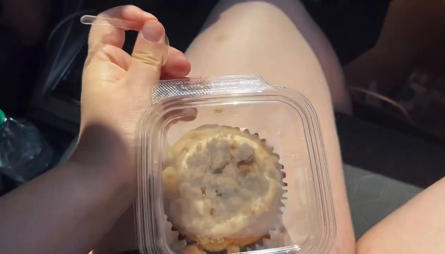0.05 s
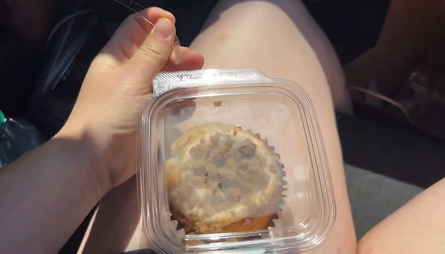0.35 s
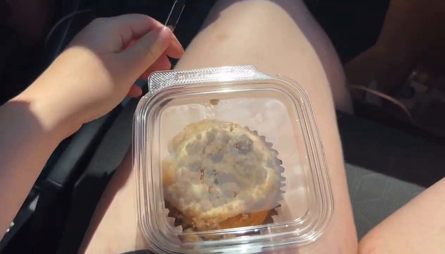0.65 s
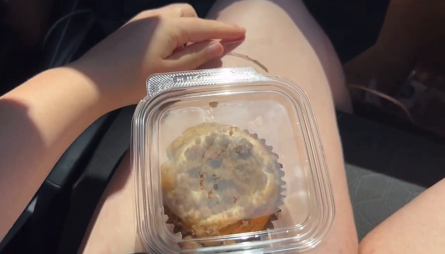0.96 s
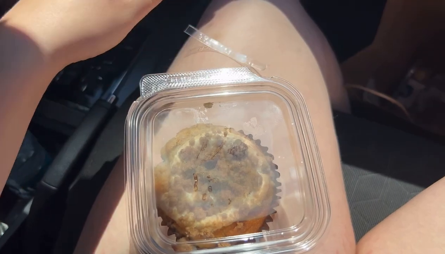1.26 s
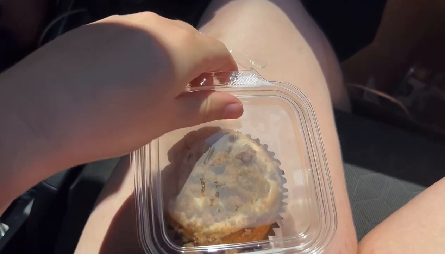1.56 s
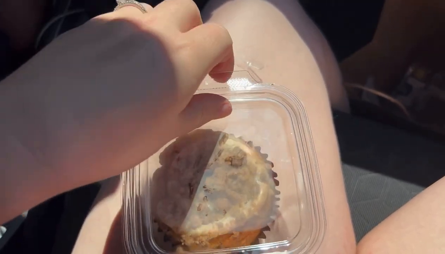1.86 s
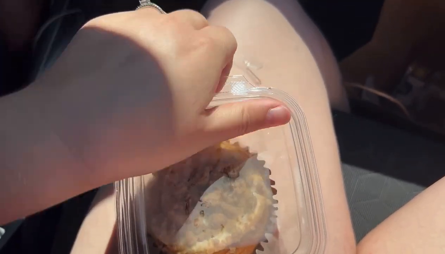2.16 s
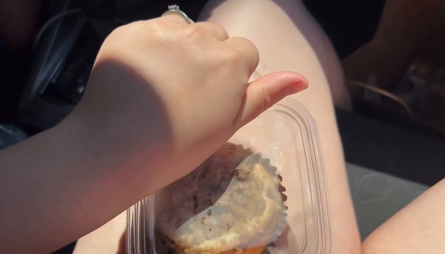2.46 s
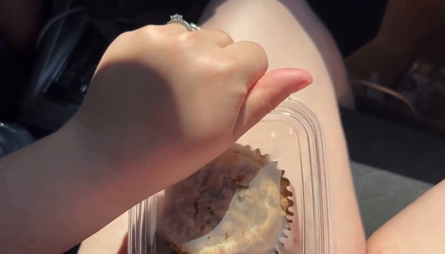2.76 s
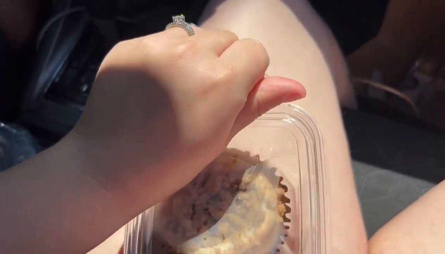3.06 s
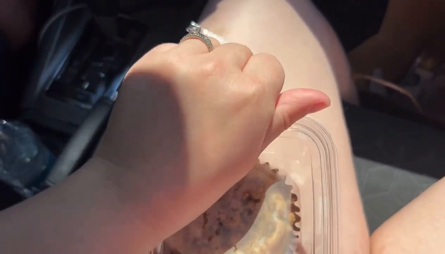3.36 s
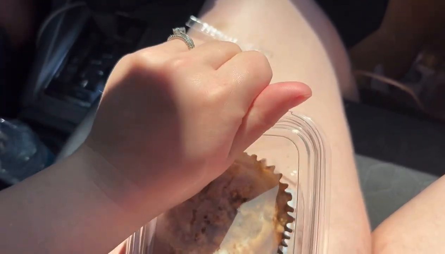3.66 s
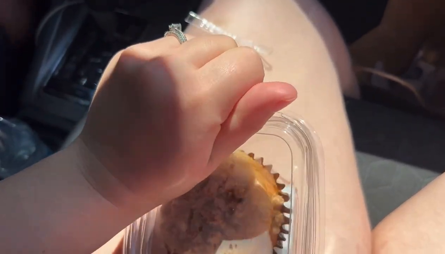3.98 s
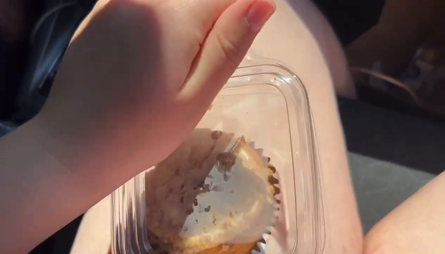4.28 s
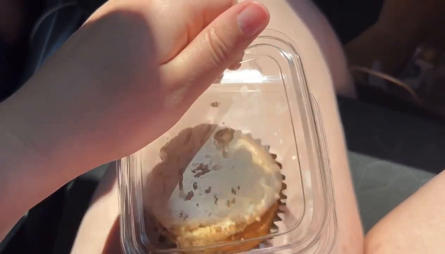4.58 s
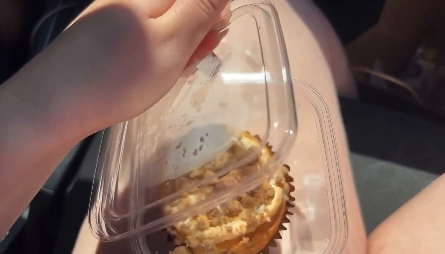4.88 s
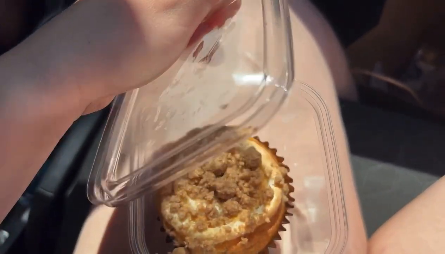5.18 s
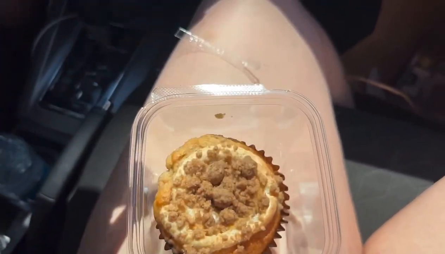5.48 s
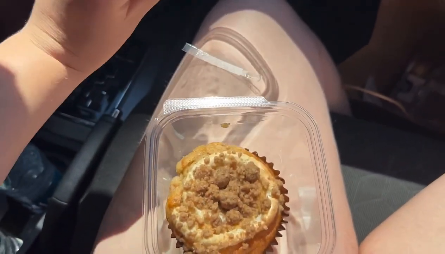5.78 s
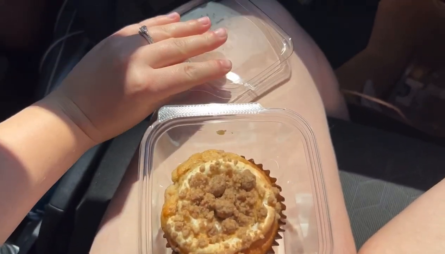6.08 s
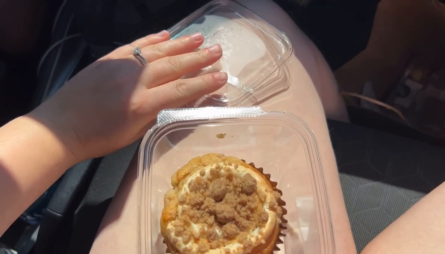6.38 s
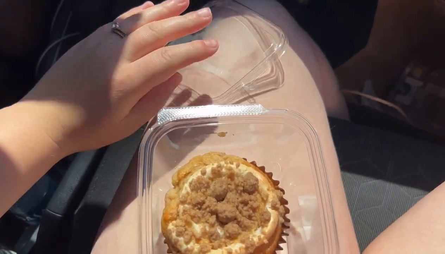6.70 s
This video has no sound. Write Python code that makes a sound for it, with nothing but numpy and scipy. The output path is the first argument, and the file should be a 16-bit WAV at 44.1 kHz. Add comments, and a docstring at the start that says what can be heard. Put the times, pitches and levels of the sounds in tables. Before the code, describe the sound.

A moving car's low rumble runs throughout, with dull bumps from the road and handling. Close to the microphone, a thin plastic food box gives a sharp click right at the start, then a tiny squeak. Fingers rub and pick at the rim in scattered ticks and crackles, with another short squeak at about 1.6 seconds. At 2.3 seconds the latch lets go with a loud snap that briefly rings the lid. Dry scraping and fine ticks follow, then a loud squeak at 3.2 seconds that drops into a rough creak. A smaller squeak comes at 3.8 seconds, and at 3.9 the lid pops out of the hollow tub, rebounding with a few clicks until about 4.2. From 4.5 seconds to the end, near 7, the handling is quieter: soft swishes, light skids and faint ticks as the lid is folded back over the rumble.

```python
"""Inside a moving car, a thin clear plastic food box is pried open on a lap, close to the microphone.
The cabin rumbles underneath, with dull bumps from the road and the handling. Fingers rub and pick
at the rim, which ticks as it buckles; plastic sticks and slips on plastic in squeaks and creaks.
The latch snaps and rings the lid, then the lid pops out of the hollow tub and is folded back."""
import sys
import numpy as np
from scipy import signal
from scipy.fft import rfft, irfft, next_fast_len
from scipy.io import wavfile
from scipy.ndimage import map_coordinates

SR = 44100
rng = np.random.default_rng(int(sys.argv[2]) if len(sys.argv) > 2 else 0)


def to_wav(sig):
    """Store sig (one row per channel, or 1-D mono) as 16-bit WAV at the path in sys.argv[1].

    Samples outside -1..1 are clipped; the rate is SR.
    """
    pcm = np.clip(np.atleast_2d(sig), -1, 1) * 32767
    pcm = np.round(pcm).astype(np.int16)
    wavfile.write(sys.argv[1], SR, pcm.T)  # frames by channels


N = 301677
TOP_HZ = 15900  # upper edge of the sound
PRE_ROLL_S, PRE_ROLL = 1 / 500, SR // 500  # room for a filter to ring ahead of a click: seconds, samples


def amp(db):
    """Decibels to gain."""
    return 10 ** (np.asarray(db) / 20)


def unit(x):
    """Scales to rms 1."""
    return x / np.sqrt(np.mean(x ** 2) + 1e-20)


def unit_hit(x):
    """Scales a short sound to the energy of 20 ms at rms 1."""
    return x * np.sqrt(.02 * SR / (np.sum(x ** 2) + 1e-20))


def curve_at(points, hz):
    """Reads a curve on a log-frequency axis."""
    f, value = np.transpose(points)
    return np.interp(np.log(hz + 1), np.log(f + 1), value)


def eq(x, points):
    """Filters by a curve of (Hz, dB) points."""
    return irfft(rfft(x) * amp(curve_at(points, np.fft.rfftfreq(len(x), 1 / SR))), len(x))


def wander(count, per_s):
    """Smooth random drift of rms about 1."""
    knots = rng.standard_normal(count // 20 + 4)
    position = np.arange(count) / (SR / per_s)
    return map_coordinates(knots, [position], order=1, mode="wrap") * np.sqrt(3 / 2)


def add(mix, s, sound):
    """Adds a sound at s seconds."""
    start = round(s * SR)
    part = mix[max(start, 0):][:len(sound) + min(start, 0)]
    part += sound[max(-start, 0):][:len(part)]


# Tone of the cabin bed. Each row: frequency in Hz, gain in dB.
CABIN_EQ = [(15, -37), (30, -10), (43, 1.5), (55, 4.5), (75, 1), (110, -3), (145, -5), (172, -5.5),
            (210, -11.5), (400, -21.5), (600, -20.5), (760, -31.5), (1300, -33), (1550, -37), (2100, -41),
            (3000, -47.5), (6000, -59), (15000, -100.5)]
# Rougher and smoother stretches of road. Each row: time in seconds, bass gain in dB.
ROAD_SWELL = [(0, -4), (1.6, -2), (2.4, 0.5), (4.3, -0.5), (4.65, 2), (5.149, -2), (5.8, -3), (6.831, -2)]
def cabin():
    """Road rumble and ventilation; the bass swells and sits almost in the centre."""
    hz = np.fft.rfftfreq(N, 1 / SR)
    bass = 1 / (1 + (hz / 260) ** 4)
    swell = amp(np.interp(np.arange(N) / SR, *np.transpose(ROAD_SWELL)) + 1.7 * wander(N, 14))
    spectra = rfft(np.array([unit(eq(rng.standard_normal(N), CABIN_EQ)) for _ in range(2)]))
    spectra[1] *= amp(curve_at([(60, -20.5), (300, -8), (1000, -1)], hz))  # narrows the low end
    mid, side = irfft(spectra * bass, N) * swell + irfft(spectra * (1 - bass), N)
    return amp(-36) * np.array([mid + side, mid - side])


def jolts(per_s=5, centre_hz=143.8, db=-45, spread_db=.5):
    """Bump rows for the small jolts that fall at random between the large ones."""
    slots = np.arange(0, N / SR, .05)
    chance, pitch, size = rng.random((len(slots), 3)).T
    rows = np.c_[slots, centre_hz * 2 ** (pitch - .5), db + spread_db * (2 * size - 1)]
    return list(rows[chance < per_s * slots[1]])


# Dull thuds of road and handling. Each row: time in seconds, pitch in Hz, relative level in dB.
THUDS = [(0.452, 112, -34), (0.482, 179, -40), (0.684, 95, -30), (0.815, 149.5, -37.5), (0.987, 106.7, -30),
         (1.258, 102.6, -29), (1.507, 155.5, -33.5), (1.842, 172, -39), (1.864, 141, -34),
         (2.461, 108, -33.5), (2.722, 200, -39), (2.973, 143, -32), (3.243, 167, -38), (3.581, 159, -34.5),
         (3.611, 61.6, -31), (3.923, 167, -34.5), (4.089, 75, -36), (4.209, 140, -34.5), (4.609, 96, -35),
         (4.961, 145.5, -29.5), (5.083, 124, -41.5), (5.488, 152, -36.5), (5.597, 91, -33.5),
         (5.659, 167, -40), (5.962, 185, -40), (6.341, 148, -36.5), (6.577, 71, -33.5)]
def bumps():
    """Each bump is a low heave of a few cycles with a soft knock on top."""
    out = np.zeros(N)
    t = np.arange(SR // 7) / SR
    rise_s, knock_rise_s = .0048, .0037
    for s, hz, db in THUDS + jolts():
        heave = (t / rise_s) ** 2 * np.exp(-t / rise_s) * np.cos(2 * np.pi * hz * (t - 2 * rise_s))
        puff = rng.standard_normal(len(t)) * (t / knock_rise_s) ** 2 * np.exp(-t / knock_rise_s)
        knock = signal.sosfilt(signal.butter(3, [1.26 * hz, 3 * hz], "band", fs=SR, output="sos"), puff)
        knock_db = -7.5 + 7.5 * np.log2(hz / 100)  # quicker bumps knock harder
        add(out, s - 2 * rise_s, amp(db) * (unit_hit(heave) + amp(knock_db) * unit_hit(knock)))
    return out * amp(3)


# What the seats leave of an echo. Each row: frequency in Hz, gain in dB.
SEAT_EQ = [(1500, 2), (5000, 3), (12000, -12)]
def reflections(x, t60, wet_db):
    """Windows and dashboard return a short stereo echo; the seats dull its top."""
    t = np.arange(SR // 6) / SR
    taps = rng.standard_normal((2, len(t))) * (rng.random((2, len(t))) < 2500 / SR)
    taps *= (t > .002) * amp(-60 * t / t60)
    taps /= np.linalg.norm(taps, axis=1, keepdims=True)
    return amp(wet_db) * signal.oaconvolve(eq(x, SEAT_EQ)[None], taps, axes=1)[:, :N]


# Stereo spread of the box. Each row: frequency in Hz, relative scatter of the left-right phase.
PHASE_SPREAD = [(300, .1), (750, .7), (1400, 1.0), (2200, .6), (5300, .75), (7000, .25)]
def near_field(x):
    """Close to the box, each resonance reaches the two microphone ports with its own phase."""
    size = next_fast_len(N + SR // 4)
    hz = np.fft.rfftfreq(size, 1 / SR)
    scatter = np.interp(hz / 190, np.arange(130), rng.uniform(-1.7, 1.7, 130))
    lead = curve_at(PHASE_SPREAD, hz) * scatter * np.sqrt(3 / 2)
    return irfft(rfft(x, size) * np.exp(1j * np.array([[.5], [-.5]]) * lead), size)[:, :N]


# The grip builds up to the snap and eases once the lid is free.
# Each row: time in seconds, scrape level in dB, swish level in dB.
GRIP = [(0, -59, -68), (.95, -68.5, -74), (1.25, -73, -86.5), (1.5, -57.5, -68), (2.0, -51.5, -64.5),
        (2.27, -45, -65), (2.36, -41.5, -53), (2.9, -50.5, -64), (3.68, -45, -59.5), (3.88, -53.5, -69),
        (4.5, -61, -60.5), (4.9, -59, -76.5), (6.83, -68, -67.5)]
# Hand moves over the box. Each row: start in seconds, length in seconds,
# share of the length at which it is fastest, peak scrape in dB, peak swish in dB.
HAND_STROKES = [(0, .023, 0.14, -21.5, -26.5), (.03, 0.14, .4, -53, -57.5), (0.122, 0.17, .3, -53, -57.5),
                (.44, 0.098, 0.59, -54, -59.5), (0.743, 0.062, 0.39, -48.5, -58),
                (0.885, 0.057, .55, -50, -51), (1.502, 0.18, 0.68, -50.5, -53.5),
                (1.72, 0.13, 0.64, -46.5, -56), (2.44, 0.1, 0.4, -52, -49), (2.587, 0.1, 0.4, -46.5, -52.5),
                (2.694, 0.12, 0.53, -46, -70), (2.782, .16, 0.39, -66, -56), (3.025, 0.15, 0.6, -62, -53.5),
                (3.208, 0.1, 0.34, -45, -51), (3.457, 0.37, 0.27, -59, -60),
                (3.744, 0.091, 0.47, -56.5, -53.5), (3.938, 0.19, 0.28, -43, -53.5),
                (4.027, 0.33, 0.54, -48, -53.5), (4.155, 0.042, 0.4, -48, -47),
                (4.304, 0.13, 0.58, -66, -60), (4.56, 0.11, 0.58, -76, -55.5),
                (5.028, 0.75, 0.25, -60, -62.5), (5.611, 0.18, 0.3, -71, -55.5),
                (5.866, 0.38, 0.29, -55, -54.5), (6.378, 0.18, 0.46, -56.5, -51)]
def hand_contact():
    """Fader rides in dB for scrape and swish: steady prying, plus an arch for each stroke."""
    s, *grip_db = np.transpose(GRIP)
    power = amp([np.interp(np.arange(N) / SR, s, db) for db in grip_db]) ** 2
    for start, length, peak, scrape_db, swish_db in HAND_STROKES:
        progress = np.arange(0, length, 1 / SR) / length
        ramp = np.interp(progress, [0, np.clip(peak, .05, .95), 1], [0, 1, 0])
        speed = np.sin(np.pi / 2 * ramp) ** 1.29
        add(power[0], start, (amp(scrape_db) * speed) ** 2)
        add(power[1], start, (amp(swish_db) * speed) ** 2)
    return 10 * np.log10(power)


def friction(per_s, spread_db, smooth_db):
    """Countless tiny catches of uneven size over a smooth slide."""
    size = amp(spread_db * np.minimum(rng.exponential(1, N), 4)) * rng.choice([-1, 1], N)
    catches = unit(size * (rng.random(N) < per_s / SR))
    return unit(catches + amp(smooth_db) * rng.standard_normal(N))


# Tone of the low scrape and of the airy swish. Each row: frequency in Hz, gain in dB.
SCRAPE_EQ = [(200, -8), (450, 3.5), (800, -1.5), (1300, -7.5), (2400, -13), (4000, -21), (8000, -75)]
SWISH_EQ = [(1000, -13), (2500, -1.5), (3500, -1.5), (7000, -3), (9000, -7.5), (12000, -3.5), (15500, -6)]
def rubbing(scrape_db, swish_db):
    """The rim scrapes in dry catches, each a short rattle of the sheet; skin swishes over it."""
    t = np.arange(SR // 40) / SR
    catch_power = friction(per_s=230, spread_db=4, smooth_db=-7) ** 2
    rattle = np.sqrt(abs(signal.oaconvolve(catch_power, amp(-120 * t / .012))[:N]))
    scrape = unit(eq(rattle * rng.standard_normal(N), SCRAPE_EQ))
    swish = unit(eq(friction(per_s=1100, spread_db=0, smooth_db=6), SWISH_EQ))
    pressure_db = 2.08 * wander(N, 70)
    return scrape * amp(scrape_db + pressure_db) + swish * amp(swish_db + pressure_db)


# Tone of the fine rib ticks. Each row: frequency in Hz, gain in dB.
GRIT_EQ = [(800, -9), (2000, 2), (4500, 0), (7500, -2), (15000, -17)]
def grit(scrape_db, swish_db):
    """Dry, separate ticks as the ribs of the rim ride over each other, only under a firm scrape."""
    per_s = np.interp(scrape_db, [-57, -50], [0, 90])
    ticks = amp(3.5 * np.minimum(rng.exponential(1, N), 3)) * (rng.random(N) < per_s / SR)
    decay = amp(-60 * np.arange(SR // 100) / SR / .005)
    bursts = signal.oaconvolve(ticks, decay)[:N] * rng.standard_normal(N)
    return unit(eq(bursts, GRIT_EQ)) * amp(np.minimum(swish_db, -50) - 5)


def stutter_db(count):
    """The level flutters as a rough contact catches and lets go."""
    return 4 * wander(count, per_s=170)


# Skin and rim skidding over the sheet. Each row: start in seconds, length in seconds,
# opening pitch in Hz, closing pitch in Hz, resonance width in Hz, level in dB.
SKID_SWEEPS = [(4.612, .04, 4500, 5600, 900, -60), (5.7, 0.082, 4600, 5140, 550, -57.5),
               (5.881, 0.12, 2720, 2600, 260, -60), (5.985, 0.12, 3100, 4360, 1200, -57.5),
               (6.432, 0.083, 3300, 4200, 1300, -56)]
def skids():
    """Uneven catches ring one resonance that slides as the contact moves."""
    out = np.zeros(N)
    catches = friction(per_s=700, spread_db=10.5, smooth_db=0)
    for start, length, from_hz, to_hz, width_hz, db in SKID_SWEEPS:
        progress = np.arange(0, length, 1 / SR) / length
        sweep = np.exp(2j * np.pi * np.cumsum(from_hz + (to_hz - from_hz) * progress) / SR)
        pole = np.exp(-np.pi * width_hz / SR)
        drive = catches[round(start * SR):][:len(sweep)]
        ring = sweep * signal.lfilter([1], np.poly([pole, pole]), drive / sweep)  # a moving band-pass
        skid = unit(ring.real * amp(stutter_db(len(ring))))
        add(out, start, amp(db) * np.sin(np.pi * progress) * skid)
    return out


# Pin-sharp ticks. Each row: time in seconds, level in dB.
EDGE_TICKS = [(2.022, -52), (2.429, -53), (2.618, -53), (2.6647, -49), (2.67, -52), (2.984, -57),
              (3.051, -60), (3.478, -56), (3.8189, -45.5), (4.018, -57), (4.162, -49), (4.18, -43.5),
              (4.206, -40.5), (4.471, -50.5), (5.455, -57), (5.463, -53)]
# Their bright tone. Each row: frequency in Hz, gain in dB.
EDGE_EQ = [(500, -23), (3000, -8), (7500, 0), (15000, 6)]
def edge_flicks(t60=.002):
    """The cut edge flicks past a rib, too briefly to ring the sheet."""
    out = np.zeros(N)
    t = np.arange(SR // 50) / SR
    for s, db in EDGE_TICKS:
        crack = rng.standard_normal(len(t)) * amp(-60 * t / t60)
        add(out, s - PRE_ROLL_S, amp(db) * unit_hit(eq(np.pad(crack, (PRE_ROLL, 0)), EDGE_EQ)))
    return out


# The voice of the lid. Each row: pitch in Hz, relative level in dB, t60 in seconds before damping.
LID_MODES = [(484, -3, .06), (568, -7, .11), (800, -3, .051), (905, 4.5, .076), (1095, -1, .051),
             (1230, -2, .065), (1385, -6, .06), (1645, 6, .046), (1795, 0, .07), (2110, -1, .051),
             (2735, 4, .032), (2895, 0, .04), (3115, -2, .033), (4215, -3, .045), (4760, -6, .045),
             (5800, -8, .039)]
def lid_ring(detune, scatter_db, sheet_db, sheet_t60, damping):
    """The lid's modes, shifted by the grip, over the dense short ring of thin sheet."""
    t = np.arange(SR // 8) / SR
    hz, db, t60 = np.transpose(LID_MODES)[:, :, None]
    shift, weight = rng.standard_normal((2, len(LID_MODES), 1))
    decays = amp(db + scatter_db * weight - 60 * damping * t / t60)
    modes = decays * np.sin(2 * np.pi * hz * (1 + detune * shift) * t)
    modes[::2] *= -1  # neighbouring modes push the air in opposite senses
    sheet = rng.standard_normal(len(t)) * amp(-60 * t / sheet_t60)
    return unit_hit(modes.sum(0)) + amp(sheet_db) * unit_hit(sheet)


# One curve per squeak. Each row: time in seconds, slip rate in Hz, level in dB,
# roughness from 0 to 1, overtone roll-off as the drop to the second harmonic in dB.
SQUEAK_CURVES = [
    [(.088, 600, -52, .05, 8), (.113, 505, -39, .05, 14), (.135, 510, -54, 0, 21)],
    [(1.612, 6100, -54, .1, 16), (1.62, 6200, -40, .12, 13), (1.64, 6100, -45, .2, 7),
     (1.668, 6300, -52, .25, 5)],
    [(1.63, 560, -42, .5, 6), (1.66, 540, -34, .2, 13), (1.68, 510, -50, .1, 20)],
    [(3.217, 1120, -48, .01, 16), (3.222, 1035, -29, .01, 4), (3.228, 1000, -20, .03, 3.8),
     (3.233, 960, -29, .1, 2.5), (3.242, 920, -39, .15, 1)],
    [(3.243, 975, -37, .2, 1), (3.264, 965, -37, .25, 1.5), (3.27, 970, -30, .2, 3),
     (3.281, 940, -30, .4, 5), (3.3, 940, -29, .45, 4), (3.32, 620, -33, .6, 4.5),
     (3.337, 480, -44, .2, 10)],
    [(3.781, 1200, -41, .02, 26), (3.793, 1230, -37, .01, 26), (3.802, 1260, -34, .01, 26),
     (3.812, 1310, -39, .01, 28), (3.823, 1330, -48, .02, 30)],
]
def squeaks():
    """Plastic sticks and slips on plastic; uneven slips turn the squeak into a creak."""
    out = np.zeros(N)
    harmonic = np.arange(1, 6)[:, None]
    for rows in SQUEAK_CURVES:
        s, *columns = np.transpose(rows)
        t = np.arange(s[0], s[-1], 1 / SR)
        hz, db, rough, loss_db = (np.interp(t, s, c) for c in columns)
        jitter_hz = (150 + .16 * hz) * rough * wander(len(t), 913)
        cycles = np.cumsum(hz + jitter_hz) / SR
        gains = amp(-loss_db * (harmonic - 1) ** 1.2) * (harmonic * hz < TOP_HZ)
        tone = (gains * np.sin(2 * np.pi * harmonic * cycles)).sum(0) / np.sqrt((gains ** 2).sum(0) / 2)
        body = lid_ring(detune=.06, scatter_db=-12, sheet_db=-3, sheet_t60=.0204, damping=4.6)
        rattle = unit(signal.fftconvolve(tone, body)[:len(t)])
        envelope = amp(db + rough * stutter_db(len(t))) * signal.windows.tukey(len(t), .08)
        add(out, s[0], envelope * (np.sqrt(1 - rough) * tone + np.sqrt(rough) * rattle))
    return out


def slips(length, per_s, rise, spread_db):
    """A short avalanche of tiny buckles around one main slip."""
    progress = np.arange(max(round(length * SR), 8)) / SR / length
    count = len(progress)
    chance, size = rng.random(SR // 20)[:count], rng.standard_normal(SR // 20)[:count]
    burst = (chance < per_s / SR) * np.sign(size) * amp(spread_db * (abs(size) - .5))
    burst *= np.interp(progress, [0, rise, 1], [.3, 1, .35])
    burst[int(rise * count)] += 1.5  # the main slip
    return burst


# The four bands that shape a click. Each entry: a band edge in Hz.
BAND_EDGES = [400, 1300, 3500, 8000, 16000]
BAND_LOW, BAND_HIGH = np.array(BAND_EDGES[:-1]), np.array(BAND_EDGES[1:])
BAND_CENTRES = np.sqrt(BAND_LOW * BAND_HIGH)
def shape_bands(x, levels_db):
    """Sets a click's weight and brightness: a smooth EQ pulls each band towards its level."""
    hz, spectrum = np.fft.rfftfreq(len(x), 1 / SR), rfft(x)
    bands = [(hz >= low) & (hz < high) for low, high in zip(BAND_LOW, BAND_HIGH)]
    for _ in range(3):
        energy = np.array([np.sum(abs(spectrum[band]) ** 2) * 2 / len(x) for band in bands])
        gain_db = levels_db - 10 * np.log10(energy / (.02 * SR))
        spectrum *= amp(curve_at(np.c_[BAND_CENTRES, gain_db], hz))
    return irfft(spectrum, len(x))


def click(drive, body, hz, levels_db, crack_db, panel_db, t60_at_1khz):
    """Slips are heard as a dry crack, through the lid, and through the one panel that flexes."""
    t = np.arange(len(body)) / SR
    panel = np.sin(2 * np.pi * hz * t) * amp(-60 * t / t60_at_1khz * np.sqrt(hz / 1000))
    crack = rng.standard_normal(len(t)) * amp(-60 * t / .0034)
    hit = signal.fftconvolve(drive, body + amp(crack_db) * unit_hit(crack))[:len(t)]
    hit = signal.sosfilt(signal.butter(2, 380, "high", fs=SR, output="sos"), hit)
    hit = shape_bands(np.pad(hit, (PRE_ROLL, 0)), levels_db)
    ring = np.pad(unit_hit(signal.fftconvolve(drive, panel)[:len(t)]), (PRE_ROLL, 0))
    panel_band = np.clip(np.searchsorted(BAND_EDGES, hz) - 1, 0, 3)
    return shape_bands(hit + amp(levels_db[panel_band] + panel_db) * ring, levels_db)


# Picking at the rim. Each row: start in seconds, slip length in seconds, panel pitch in Hz,
# relative band level at 2 kHz in dB, tilt in dB per octave.
RIM_TICKS = [(.001, 0.0093, 684, -25.5, -2), (0.064, 0.0065, 515, -49.5, -5.5),
             (0.088, 0.0088, 496, -51.5, -3), (0.384, 0.018, 1990, -56.5, 0),
             (0.459, 0.031, 2100, -51.5, -2), (0.56, 0.01, 1301, -40.5, -2),
             (0.776, 0.0067, 2440, -51, 0.5), (0.794, 0.012, 2350, -46.5, -3.5),
             (0.908, 0.028, 870, -50, -6.5), (0.915, .003, 3740, -44.5, -2.5),
             (1.074, 0.011, 5850, -54.5, -2), (1.314, .0045, 577, -60.5, -3),
             (1.421, 0.0076, 5850, -50, -4), (1.479, 0.0066, 610, -51, -4), (1.618, .0035, 6380, -44, 3),
             (1.625, 0.025, 6860, -40, -7.5), (1.641, 0.015, 527, -46, 2.5), (1.75, 0.016, 785, -44.5, -3),
             (1.785, 0.022, 790, -49.5, -7.5), (1.81, 0.0089, 724, -41, -1.5), (1.83, 0.014, 529, -47, -7),
             (2.075, 0.0052, 783, -40.5, -1.5), (2.089, 0.0043, 4900, -42.5, -2.4),
             (2.394, 0.00085, 2300, -52.5, -4), (2.413, 0.0015, 2280, -46, -1.5),
             (2.427, 0.001, 1770, -48.5, -3), (2.46, 0.0011, 6400, -45.5, -5.5),
             (2.499, 0.0013, 5600, -57, -4), (2.54, 0.0015, 6800, -48.5, -5),
             (2.606, 0.0012, 6600, -46, -2.5), (2.664, 0.0017, 7070, -45, -1),
             (2.82, 0.004, 1000, -55, -4.5), (2.955, 0.0031, 705, -47.5, -2.5),
             (2.986, 0.0018, 6800, -48.5, -6), (3.05, 0.0039, 4700, -43.5, -2),
             (3.183, 0.002, 1920, -47, -4.5), (3.246, 0.0036, 1750, -41, -5.5),
             (3.27, 0.0015, 1224, -40, -5), (3.295, 0.0045, 1025, -42.5, -6.5),
             (3.311, 0.0036, 1050, -48.5, -8), (3.355, .001, 1104, -58, -4.5), (3.394, .002, 1975, -46, -6),
             (3.414, .002, 1800, -53.5, -9), (3.551, 0.0027, 2210, -48.5, -5),
             (3.622, 0.0011, 1710, -44, -6.5), (3.651, 0.0013, 1800, -49.5, -8),
             (3.706, 0.00075, 2310, -52, -6), (3.7752, .0015, 1034, -38, -1), (3.915, 0.0041, 1876, -44, 2),
             (3.969, .002, 617, -46, -4), (3.988, 0.0017, 4240, -44.5, -6),
             (4.005, .001, 4070, -48.5, -4.5), (4.018, .001, 2450, -53, -7),
             (4.167, 0.0034, 583, -47, -6.5), (4.204, 0.0023, 3690, -43.5, -0.5),
             (4.47, 0.0028, 1004, -52.5, -3), (5.535, 0.0035, 4850, -63.5, 1), (5.71, 0.0067, 960, -64, -9),
             (5.857, .012, 3450, -59, -3), (5.965, 0.0043, 4100, -55.5, 2.5)]
# The tone these ticks share. Each entry: gain of one band in dB, low to high.
RIM_EQ = [-0.72, 0.9, -0.31, -0.95]
def rim_ticks():
    """The rim buckles in small ticks and crackles, damped by the fingers."""
    out = np.zeros(N)
    for s, length, hz, db, tilt_db in RIM_TICKS:
        sheet_t60 = .064 + 1.1 * length  # longer slips move more of the sheet and ring longer
        body = lid_ring(detune=.08, scatter_db=6.5, sheet_db=9.5, sheet_t60=sheet_t60, damping=1.7)
        drive = slips(length, per_s=1300, rise=.33, spread_db=3.5)
        panel_lift_db = 5 * ((hz >= BAND_LOW) & (hz < BAND_HIGH))
        levels_db = db + np.array(RIM_EQ) + tilt_db * np.log2(BAND_CENTRES / 2000) + panel_lift_db
        tick = click(drive, body, hz, levels_db, crack_db=6.5, panel_db=-1.5, t60_at_1khz=.066)
        add(out, s - PRE_ROLL_S, tick)
    return out * amp(-3)


# The hollow ring of the tub. Each row: pitch in Hz, relative level in dB, t60 in seconds.
TUB_MODES = [(324, -6.5, 0.034), (456, -4, .06), (564, -3.5, .085), (804, 0, 0.029), (954, -4.5, 0.03),
             (1133, -7.5, 0.037), (1860, -21, 0.034), (2660, -16, 0.04)]
# The lid leaving its seat. Each row: start in seconds, push length in seconds, level in dB.
LID_PUSHES = [(3.9173, 0.00035, -21), (3.932, 0.0015, -33), (3.978, 0.0028, -29), (4.207, 0.00097, -35.5)]
def lid_pops():
    """The lid springs free and rebounds; each push rings the tub, a slower push more dully."""
    out = np.zeros(N)
    t = np.arange(SR // 7) / SR
    hz, db, t60 = np.transpose(TUB_MODES)[:, :, None]
    modes = amp(db - 60 * t / t60) * np.sin(2 * np.pi * hz * t)
    modes[::2] *= -1
    for s, length, level_db in LID_PUSHES:
        push = np.sin(np.pi * np.minimum(t / length, 1)) ** 2
        add(out, s, amp(level_db) * unit_hit(signal.fftconvolve(push, modes.sum(0))[:len(t)]))
    return out


# The big snap. Its one row: start in seconds, slip length in seconds, panel pitch in Hz,
# then the relative level in dB of each of the four bands.
LATCH_SNAP = [(2.2948, 0.00697, 2820, -19.5, -19.5, -25, -32.5)]
# Tone of the tear that leads into it. Each row: frequency in Hz, gain in dB.
TEAR_EQ = [(400, -14), (1300, -10), (2800, 1.5), (7000, 3.5)]
def latch():
    """The rim tears over the latch in a burst of slips, then one blow sets the whole lid ringing."""
    out = np.zeros(N)
    s, length, hz, *levels_db = LATCH_SNAP[0]
    levels_db = np.array(levels_db)
    ring = lid_ring(detune=0, scatter_db=0, sheet_db=-10, sheet_t60=.05, damping=1.3)
    t = np.arange(len(ring)) / SR
    sheet = unit_hit(rng.standard_normal(len(t)) * amp(-60 * t / .025))
    drive = slips(length, per_s=4500, rise=.35, spread_db=2)
    tear = eq(click(drive, sheet, hz, levels_db, crack_db=-.5, panel_db=-5, t60_at_1khz=.023), TEAR_EQ)
    ring = np.pad(ring, (PRE_ROLL + round(.0038 * SR), 0))[:len(tear)]  # the blow lands 3.8 ms in
    add(out, s - PRE_ROLL / SR, shape_bands(unit_hit(tear) + amp(2) * unit_hit(ring), levels_db))
    return out * amp(1)


def scene():
    """The box over the cabin bed; each layer of the box gets its own stereo spread."""
    scrape_db, swish_db = hand_contact()
    layers = [latch(), squeaks(), rubbing(scrape_db, swish_db), grit(scrape_db, swish_db),
              skids(), rim_ticks(), lid_pops(), edge_flicks()]
    box = sum(near_field(layer) for layer in layers)
    return box + reflections(sum(layers), t60=.089, wet_db=-11) + cabin() + bumps()


# Phase between the microphone ports. Each row: frequency in Hz, lead of the left in radians.
LEFT_LEAD = [(0, 0), (1250, .1), (1450, .9), (1650, 5.2), (1900, 6.3), (3000, 7.25), (4500, 6.4),
             (5400, 5.4), (6200, 6.05), (7400, 6.15), (9400, 3.25), (10600, 3.05), (12000, .1), (13800, 0),
             (15100, -3)]
# Balance of the ports. Each row: frequency in Hz, left over right in dB.
LEFT_GAIN = [(120, 0), (350, 2.5), (750, 2.5), (1400, -1.5), (3500, 1.8), (6200, 0)]
# Overall treble tone: a lift near 8.7 kHz, softer above 12 kHz. Each row: frequency in Hz, gain in dB.
TREBLE_EQ = [(6500, 0), (8700, 4.5), (12000, -2.5)]
def record(dry):
    """Two microphone ports with their own phase and level, an overall treble EQ, then a steep high cut."""
    size = next_fast_len(N + SR // 4)
    hz = np.fft.rfftfreq(size, 1 / SR)
    side = np.array([[.5], [-.5]])
    phase = side * np.interp(hz, *np.transpose(LEFT_LEAD))
    gain = amp(curve_at(TREBLE_EQ, hz) + side * curve_at(LEFT_GAIN, hz))
    ports = irfft(rfft(dry, size) * np.exp(1j * phase) * gain, size)[:, :N]
    high_cut = signal.firwin(255, TOP_HZ, window=("kaiser", 9), fs=SR)
    return signal.oaconvolve(ports, high_cut[None], "same")


dry = scene()
out = record(dry)
to_wav(out)
```